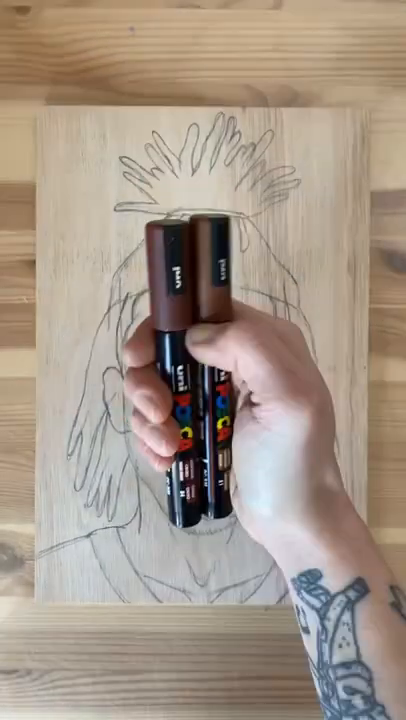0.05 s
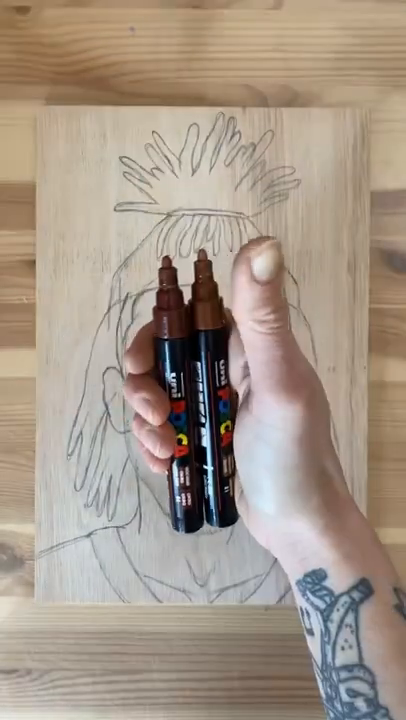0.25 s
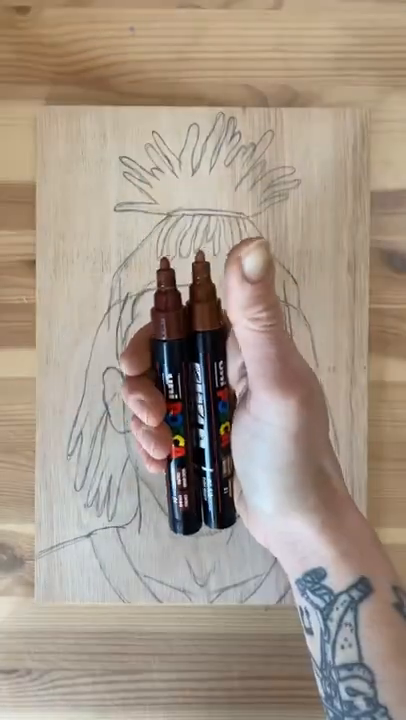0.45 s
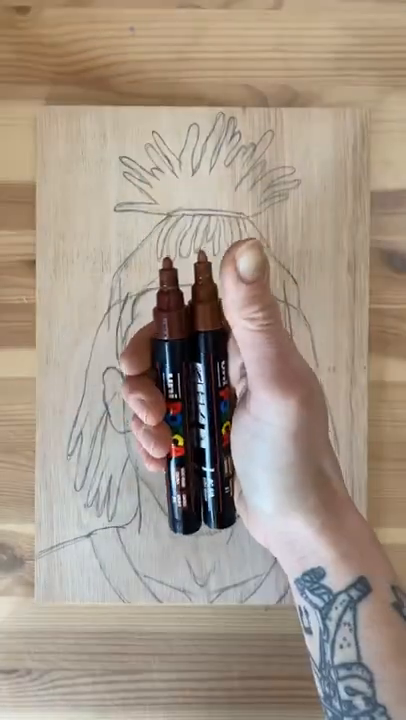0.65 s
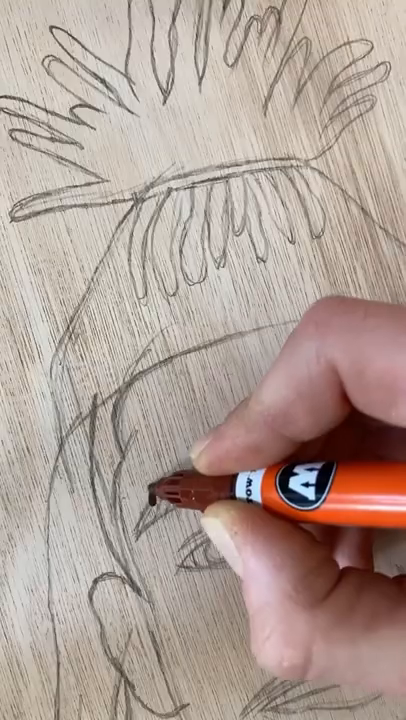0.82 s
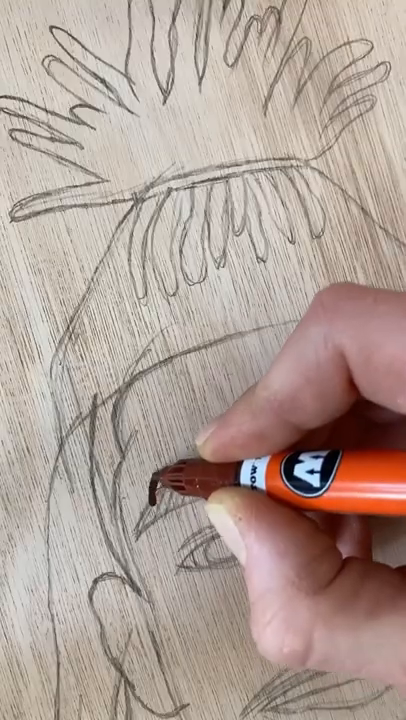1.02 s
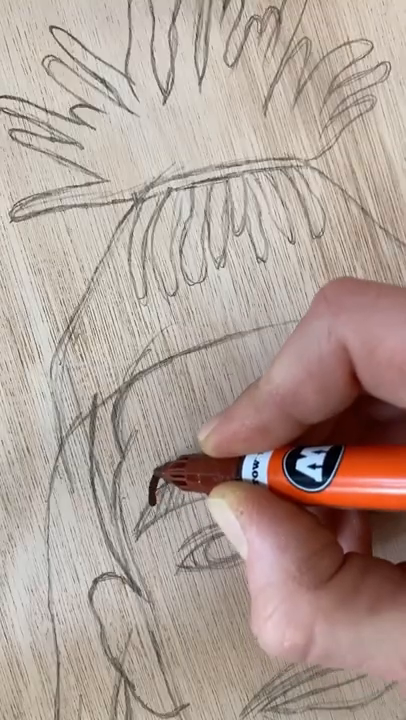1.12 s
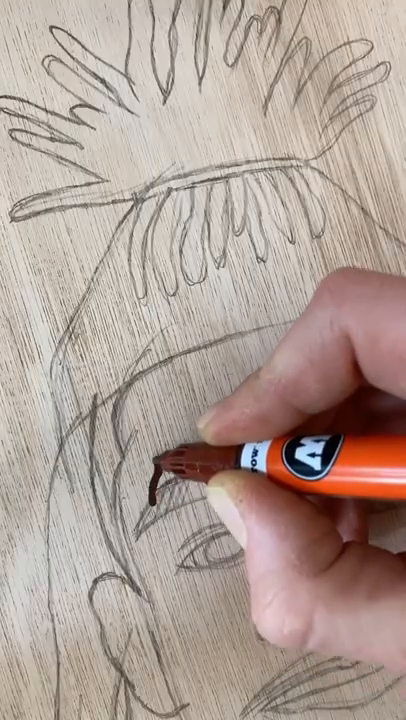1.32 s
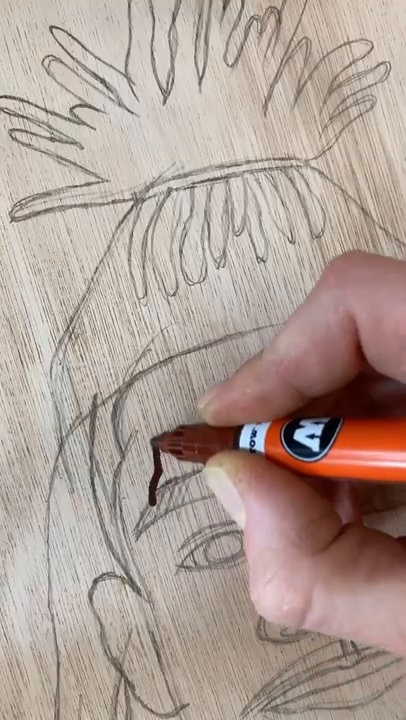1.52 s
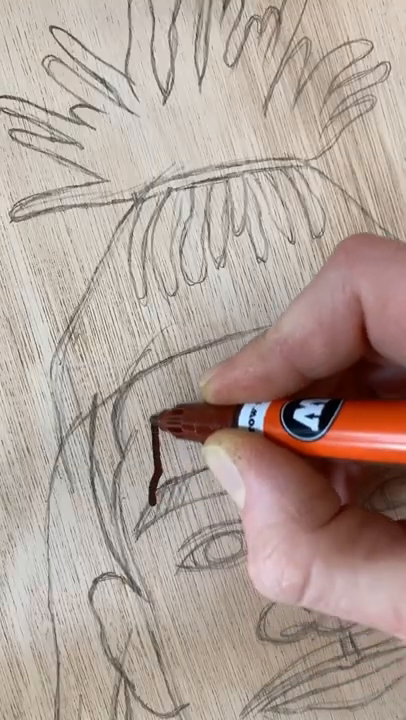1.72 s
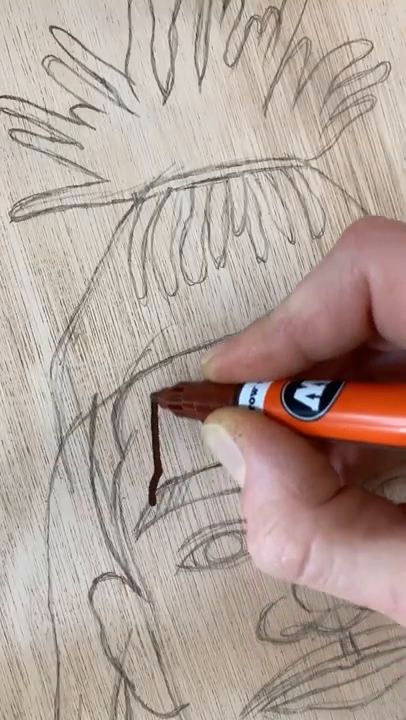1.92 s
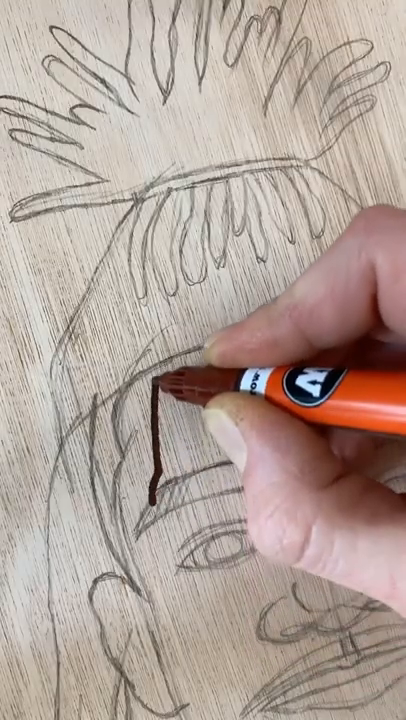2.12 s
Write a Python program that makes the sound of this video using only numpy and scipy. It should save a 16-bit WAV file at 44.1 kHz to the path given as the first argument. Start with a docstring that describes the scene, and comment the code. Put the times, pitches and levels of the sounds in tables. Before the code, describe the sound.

Plastic marker caps pop off, then drop and clatter on a wooden board.

```python
"""First comes a soft bump of fingers gripping two plastic paint markers, with a tick of a nib on wood.
A thumb pushes the caps off: they scrape free, pop, then drop and rattle on a wooden board in a
small, echoing room. Each knock clicks a cap's shell, rings its hollow and thumps the wood.
The clatter is cut off abruptly, and in the quiet a nib ticks and rubs faintly along the wood."""
import sys
import numpy as np
from scipy import signal
from scipy.fft import rfft, irfft
from scipy.io import wavfile

SR = 44100
rng = np.random.default_rng(int(sys.argv[2]) if len(sys.argv) > 2 else 0)


def materialize(psi):
    """Save the field psi as 16-bit PCM at rate SR to the path in sys.argv[1].

    A 1-D psi becomes a single channel; in a 2-D psi each row is a channel.
    """
    bounded = np.clip(np.atleast_2d(psi).T, -1, 1)
    quanta = np.round(bounded * 32767).astype(np.int16)
    wavfile.write(sys.argv[1], SR, quanta)


N = 94815
TIME = np.arange(N) / SR
HIT_SAMPLES = 6000


def from_db(db):
    """Turn decibels into a number to multiply a sound by."""
    return 10 ** (np.asarray(db) / 20)


def at_hz(points, hz):
    """Look up a frequency in a table, sliding between rows with every octave equally wide."""
    row_hz, values = np.transpose(points)
    return np.interp(np.log(np.maximum(hz, 1)), np.log(row_hz), values)


def add(track, start_s, sound):
    """Mix a sound into a track at the given time."""
    i = max(int(start_s * SR), 0)
    track[i:i + len(sound)] += sound[:len(track) - i]


def standard_hit(sound):
    """Give a sound the same energy as 7 milliseconds at level 1."""
    return sound * np.sqrt(.007 * SR / (np.sum(sound ** 2) + 1e-20))


def noise(colour, size):
    """Noise at level 1; the colour table says how strong its lows and highs are."""
    hz = np.arange(size // 2 + 1) * SR / size
    shaped = irfft(rfft(rng.standard_normal(size)) * from_db(at_hz(colour, hz)), size)
    return shaped / shaped.std()


def friction(colour, levels):
    """Rubbing noise that swells and fades as its level table says."""
    return noise(colour, N) * from_db(np.interp(TIME, *np.transpose(levels)))


def burst(colour, fade_s):
    """A short spurt of rubbing noise that dies away."""
    return standard_hit(noise(colour, HIT_SAMPLES) * np.exp(-TIME[:HIT_SAMPLES] / fade_s))


def strike(tones, contact_s, tilt_db=0, lag_s=0):
    """A click and a brief chatter ring an object's tones; a harder hit tilts them toward the highs."""
    out = np.zeros(HIT_SAMPLES)
    middle_octave = np.mean(np.log2([tone[0] for tone in tones]))
    for k, (hz, db, ring_s) in enumerate(tones):
        force = .31 * rng.standard_normal(HIT_SAMPLES) * np.exp(-TIME[:HIT_SAMPLES] / contact_s)
        force[0] += 2   # the click that starts the chatter
        detune, spread = rng.uniform(-1, 1, 2)
        angle = 2 * np.pi * hz * (1 + .022 * detune) / SR   # the spot that is hit shifts the pitch
        decay = from_db(-60 / (ring_s * SR))
        ring = signal.lfilter([1, 0, -1], [1, -2 * decay * np.cos(angle), decay ** 2], force + 1e-18)
        level_db = db + tilt_db * (np.log2(hz) - middle_octave) + 2.4 * spread
        delay_s = lag_s * np.sqrt(1000 / hz)   # low tones travel slower through bending wood
        add(out, delay_s, (-1) ** k * from_db(level_db) * standard_hit(ring))
    return out


# The dull sound of the grip. Each row: frequency in Hz, strength in dB.
GRIP_COLOUR = [(30, -12), (100, 3), (180, -11.5), (400, -15), (800, -24), (2200, -24.5), (5000, -38.5),
               (10000, -50), (16000, -57)]
# How loud the grip is. Each row: time in seconds, level in dB.
GRIP_LEVELS = [(0, -44.5), (0.014, -37.5), (0.031, -43.5), (.047, -44.5), (.052, -96)]
def grip():
    """Fingers rub on the markers with a short, low bump."""
    return friction(GRIP_COLOUR, GRIP_LEVELS)


# The background of the room. Each row: frequency in Hz, strength in dB.
HUSH_COLOUR = [(20, -25), (45, -4.5), (66, 0.5), (84, -5), (102, -0.5), (135, -8.5), (200, -15), (320, -14),
               (600, -21.5), (1100, -23), (3160, -33), (7000, -40.5), (12000, -45.5), (15500, -59.5)]
def room_hush():
    """A faint, steady rumble lies under everything."""
    return from_db(-55) * noise(HUSH_COLOUR, N)


# The sound of one nib tick. Each row: frequency in Hz, strength in dB.
TICK_COLOUR = [(150, -11), (400, -17.5), (700, 6.5), (1100, 1), (1450, -6), (2500, 1), (4500, -8.5),
               (6500, -10), (9000, -19), (15000, -25)]
# The nib's touches. Each row: start in seconds, level in dB, treble boost or cut in dB.
NIB_TOUCHES = [(.005, -44, -9), (1.2801, -73, 6), (1.556, -53, -5.5), (1.6478, -63, 2.5),
               (1.7425, -47, 3.5), (1.9264, -50.5, -32), (2.0453, -53, -15)]
def nib_ticks():
    """The nib touches the wood with tiny ticks, some duller than others."""
    out = np.zeros(N)
    for start_s, db, treble_db in NIB_TOUCHES:
        tick = burst(TICK_COLOUR, fade_s=.0029)
        dull = signal.sosfilt(signal.butter(1, 2000, fs=SR, output="sos"), tick)
        treble = tick - dull
        add(out, start_s, from_db(db) * (dull + from_db(treble_db) * treble))
    return out


# The tone of the room's echo. Each row: frequency in Hz, strength in dB.
ECHO_COLOUR = [(80, 4.5), (135, 0.5), (190, -2), (300, -0.5), (450, 5.5), (800, 4), (1300, 5.5),
               (2200, -2.5), (2700, -2.5), (3600, -5.5), (4600, -2), (6000, -4.5), (9000, -3.5), (11500, 0),
               (15000, -8.5)]
# How long the echo lasts. Each row: frequency in Hz, seconds to fade by 60 dB.
ECHO_FADES = [(120, 0.17), (500, 0.14), (2300, 0.43), (6000, 0.46), (14000, 0.087)]
def room_echo(sound):
    """Reflections from the walls build up quickly; the very highest die away first."""
    t = TIME[:SR // 2]
    hz = np.arange(len(t) // 2 + 1) * SR / len(t)
    white = rfft(rng.standard_normal(len(t)))
    delay_s, build_s = .0013, .00402
    build = np.clip((t - delay_s) / build_s, 0, 1)
    edges_hz = np.geomspace(60, 17000, 34)
    echo = np.zeros(len(t))
    for low, high in zip(edges_hz, edges_hz[1:]):
        centre = np.sqrt(low * high)
        fade = np.exp(-np.log(1000) * t / at_hz(ECHO_FADES, centre))
        band = irfft(white * ((hz >= low) & (hz < high)), len(t)) * build * fade
        band *= np.sqrt(2 * (high - low) / SR / np.sum(band ** 2))   # equal energy per Hz
        echo += band * from_db(at_hz(ECHO_COLOUR, centre))
    return signal.fftconvolve(sound, echo)[:N]


HOLLOW_RING_S = .015   # time for a cap's hollow to fade by 60 dB
# The sound of plastic scraping. Each row: frequency in Hz, strength in dB.
SCRAPE_COLOUR = [(150, -23), (450, -10), (800, -6), (1300, -0.5), (3300, -1.5), (4700, -11), (6300, -2),
                 (7200, -8.5), (9000, -8.5), (12000, -15.5), (16000, -36.5)]
# A cap's slips as it comes off. Each row: start in seconds, fade time in seconds,
# ring level in dB, ring pitch in Hz, scrape level in dB.
CAP_SLIPS = [(0.1928, .012, -37.5, 2300, -30.5), (0.203, .005, -28.5, 2460, -26.5),
             (0.2056, 0.0071, -35, 2740, -28.5), (0.2202, .0015, -28, 2570, -38),
             (0.225, .006, -42, 2540, -44.5), (0.233, .003, -37, 2560, -46)]
def uncapping():
    """Plastic scrapes over plastic, and the hollow of the cap rings as it pops free."""
    out = np.zeros(N)
    for start_s, fade_s, ring_db, hz, scrape_db in CAP_SLIPS:
        scrape = from_db(scrape_db) * burst(SCRAPE_COLOUR, fade_s)
        pop = strike([(hz, ring_db, HOLLOW_RING_S)], contact_s=fade_s)
        add(out, start_s, scrape + pop)
    return out


# The tones of a cap's shell, the board and the table under it.
# Each row: pitch in Hz, level in dB, seconds to fade by 60 dB.
SHELL_TONES = [(1850, -6.5, 0.0061), (2795, -4.5, .010), (3350, -10, 0.018), (5060, -12, .008),
               (5902, -3.5, .006), (7220, -8.5, .005), (8690, -11, .004), (9815, -19.5, .004),
               (11040, -21.5, 0.0053)]
BOARD_TONES = [(142, -14, .04), (269, -12.5, 0.022), (327, -5.5, 0.03), (419, -5, 0.032), (506, -8, .03),
               (648, -11.5, 0.032), (947, -7, 0.0059), (1194, -7, 0.014), (1615, -7.5, 0.011)]
TABLE_TONES = [(112, -32.5, 0.052), (137.5, -27.5, .13)]
# A cap hits the board or the other cap. Each row: start in seconds, board level in dB,
# board tilt in dB per octave (higher is brighter), ring level in dB, ring pitch in Hz,
# shell level in dB, shell tilt in dB per octave, level sent to the echo in dB.
CAP_KNOCKS = [(0.3479, -17.5, -1.5, -23.5, 2310, -24, 4, -5.5),
              (0.3637, -19.5, -2.5, -18.5, 2715, -24, -1, -8.5),
              (0.3892, -13.5, -1, -11.5, 2230, -23, 0, -12), (0.3927, -13, -3, -15, 2263, -27, -2, -10.5),
              (.4000, -21.5, 0.5, -30.5, 2930, -18.5, 1, -13), (0.4097, -25.5, 1, -21, 2228, -18.5, 2, -7),
              (0.414, -25, -3.5, -13.5, 2152, -26.5, 1.5, -3),
              (0.453, -25.5, -0.5, -39.5, 2410, -50, -5, -8), (0.4706, -19.5, -2, -30, 2050, -30, -2, -11),
              (0.4913, -30.5, 3, -30.5, 2320, -23.5, -2.5, -7),
              (0.5046, -40.5, -2, -26.5, 2290, -34.5, 0, -8.5), (0.5135, -30, -1, -34.5, 2660, -27, -3, -7),
              (0.5474, -37, 3.5, -29.5, 2497, -40, -4, -5), (.5736, -21, 3, -11.5, 2180, -15.5, 0.5, -5),
              (0.5943, -37, 3, -31, 2300, -28, -4, -8.5),
              (.6172, -42.5, -0.5, -28.5, 2090, -31.5, -3, -7.5),
              (.6365, -43, -4, -32.5, 2380, -47.5, -8.5, 2),
              (0.6837, -25.5, 0.5, -30.5, 2700, -29.5, -3.5, -9),
              (0.741, -34.5, 2, -32, 2355, -33, -3.5, -7.5), (0.7671, -28, 3, -14, 2454, -20.5, -2.5, -9.5)]
def bouncing_caps():
    """Knocks ring shell, hollow, board and table. Gives the direct sound and the part that will echo."""
    direct, to_room = np.zeros(N), np.zeros(N)
    shell_contact_s, wood_contact_s = .0023, .0013
    for start_s, board_db, board_tilt, ring_db, hz, shell_db, shell_tilt, echo_db in CAP_KNOCKS:
        click = from_db(shell_db) * strike(SHELL_TONES, shell_contact_s, shell_tilt)
        ring = strike([(hz, ring_db, HOLLOW_RING_S)], contact_s=.0016)
        thump = from_db(board_db) * strike(BOARD_TONES, wood_contact_s, board_tilt, lag_s=.001)
        # The table booms softly, a little louder when the ring is louder.
        boom = from_db(.23 * ring_db) * strike(TABLE_TONES, wood_contact_s, lag_s=.004)
        graze_after_s = rng.uniform(.0072, .02)   # the rim touches again, lightly
        graze = from_db(shell_db - 17.5) * strike(SHELL_TONES, shell_contact_s, shell_tilt)
        knock = np.zeros(N)
        add(knock, start_s, click + thump + boom)
        add(knock, start_s + .0005, ring)
        add(knock, start_s + graze_after_s, graze)
        direct += knock
        to_room += from_db(echo_db) * knock
    soften_highs = signal.butter(2, 12000, fs=SR, output="sos")
    return signal.sosfilt(soften_highs, np.array([direct, to_room]) + 1e-18)


# The sound of the nib's stroke. Each row: frequency in Hz, strength in dB.
RUB_COLOUR = [(200, -15), (600, 3), (800, -3), (1080, 5), (1450, -8), (2600, -4), (4500, -22), (8500, -21),
              (12000, -27), (16000, -34)]
# How loud the stroke is. Each row: time in seconds, level in dB.
RUB_LEVELS = [(1.3, -88), (1.5, -67.5), (1.651, -63.5), (1.85, -62.5), (2.041, -61.5), (2.09, -71)]
def nib_rub():
    """The nib drags faintly along the wood."""
    return friction(RUB_COLOUR, RUB_LEVELS)


def scene():
    """Mix it all: the caps and their echo stop dead, while the nib and the hush carry on."""
    slips, ticks = uncapping(), nib_ticks()
    knocks, knocks_to_room = bouncing_caps()
    caps = slips + knocks + room_echo(knocks_to_room + from_db(-8) * slips)
    stop_s, fade_s = .809, .002
    caps *= np.clip((stop_s - TIME) / fade_s, 0, 1)
    nib = ticks + from_db(-11) * room_echo(ticks) + nib_rub()
    return (grip() + room_hush() + nib + caps)[None]


def record(dry):
    """Round off the loudest peaks and cut the very highest treble."""
    ceiling, top_hz = .92, 16300
    rounded = dry / (1 + (dry / ceiling) ** 4) ** .25
    return signal.sosfilt(signal.ellip(10, .1, 80, top_hz, fs=SR, output="sos"), rounded)


dry = scene()
out = record(dry)
materialize(out)
```